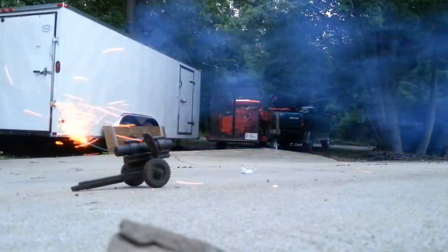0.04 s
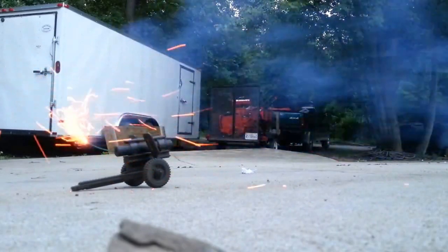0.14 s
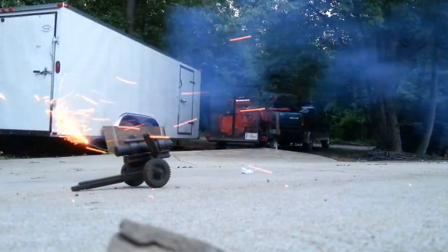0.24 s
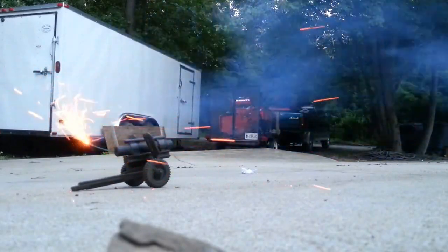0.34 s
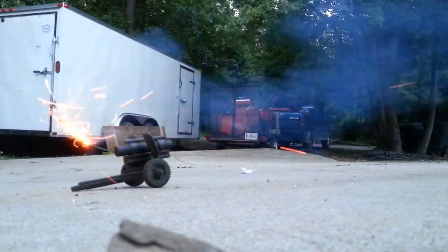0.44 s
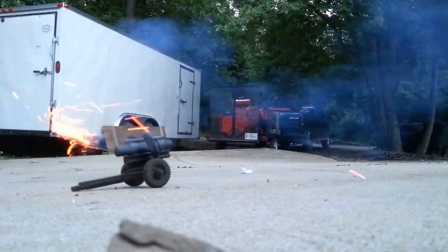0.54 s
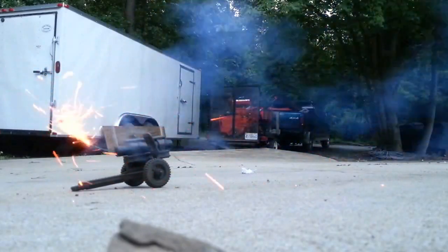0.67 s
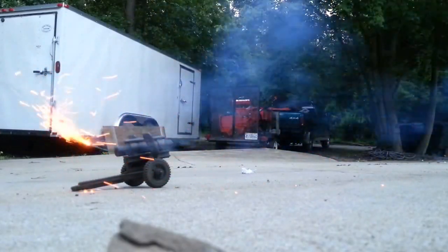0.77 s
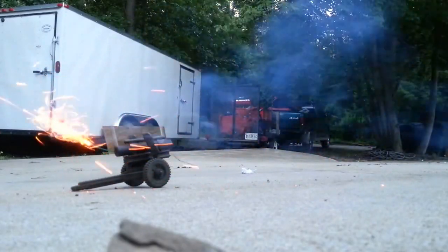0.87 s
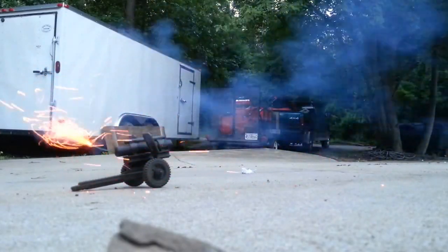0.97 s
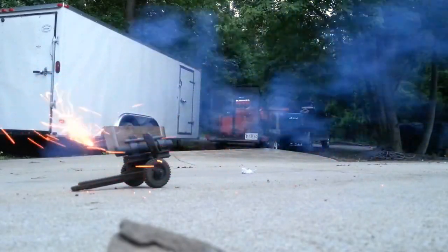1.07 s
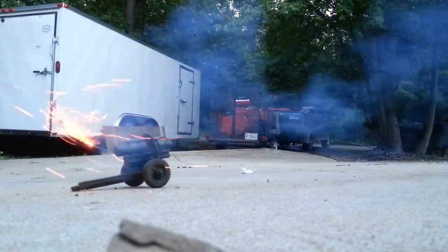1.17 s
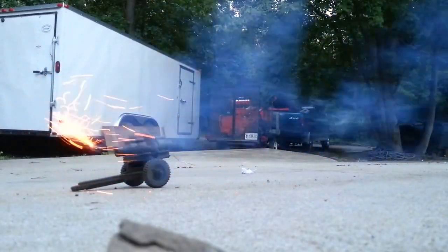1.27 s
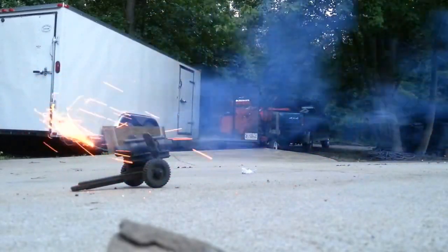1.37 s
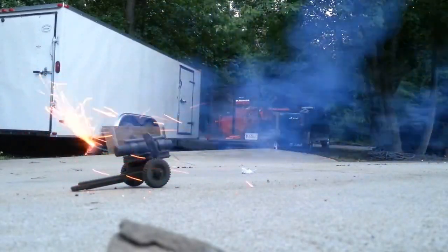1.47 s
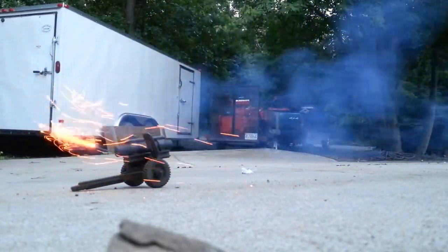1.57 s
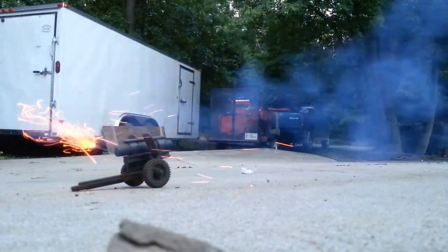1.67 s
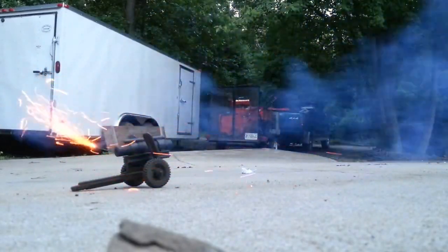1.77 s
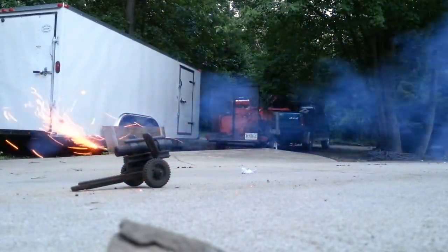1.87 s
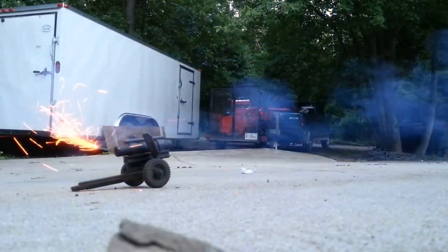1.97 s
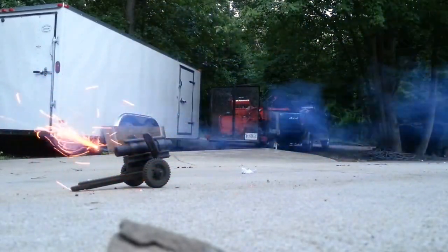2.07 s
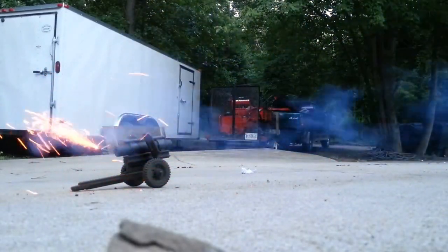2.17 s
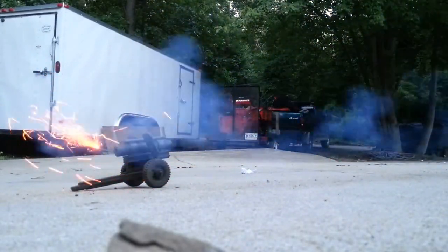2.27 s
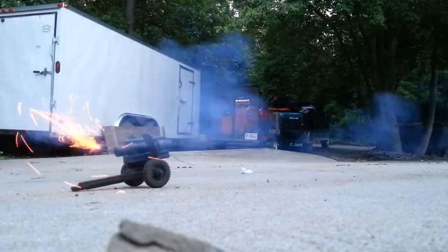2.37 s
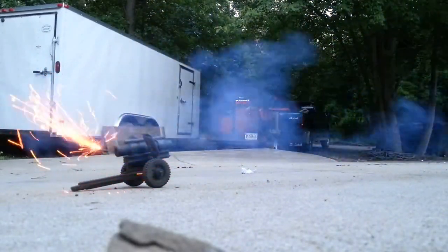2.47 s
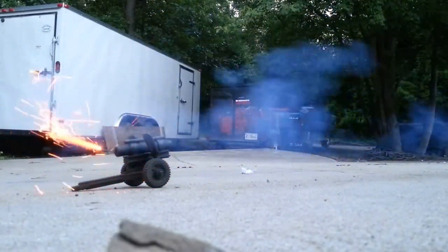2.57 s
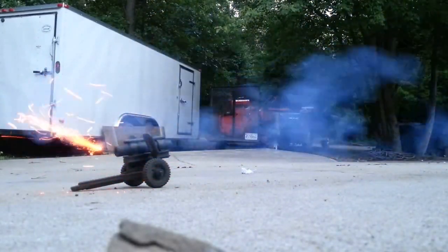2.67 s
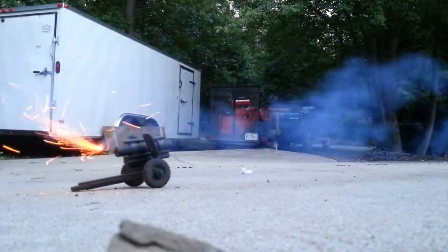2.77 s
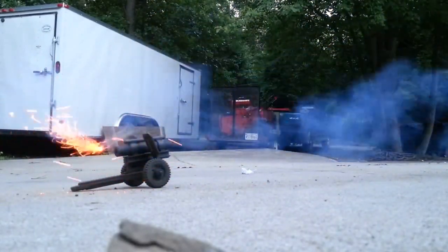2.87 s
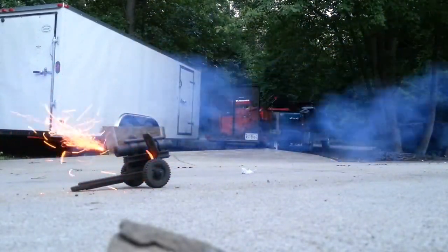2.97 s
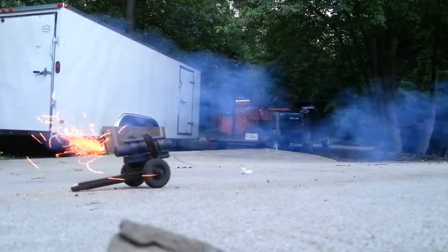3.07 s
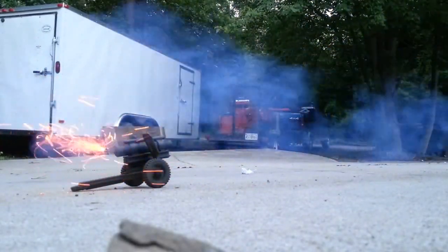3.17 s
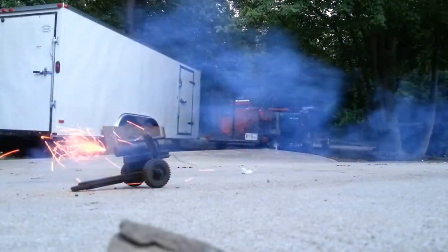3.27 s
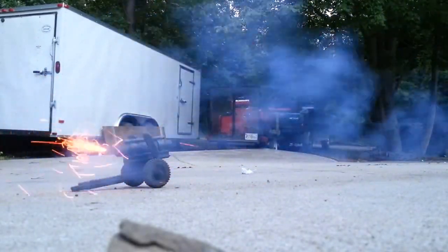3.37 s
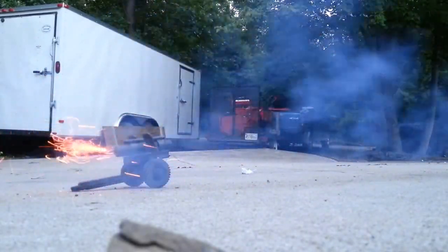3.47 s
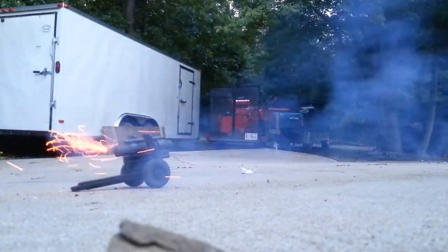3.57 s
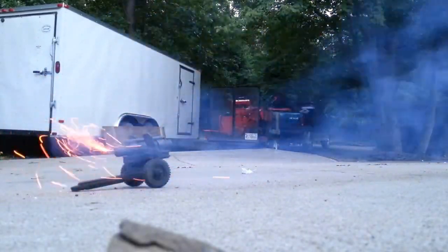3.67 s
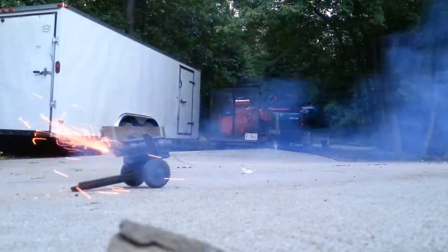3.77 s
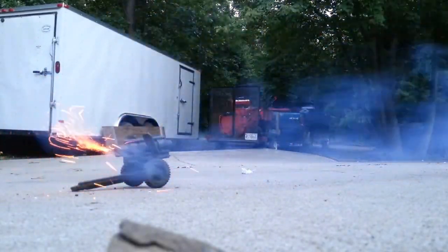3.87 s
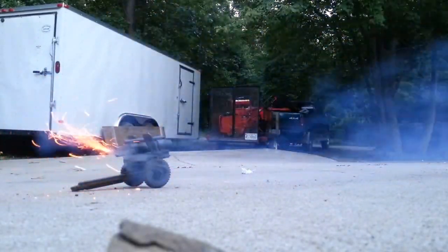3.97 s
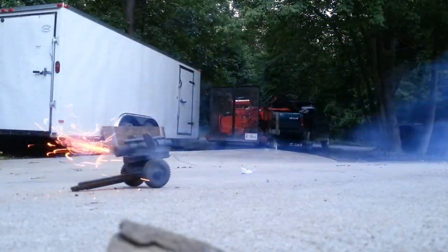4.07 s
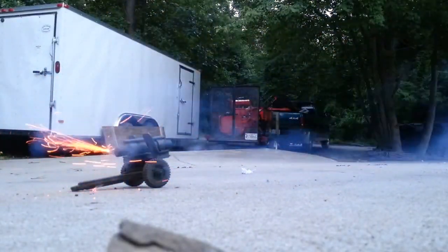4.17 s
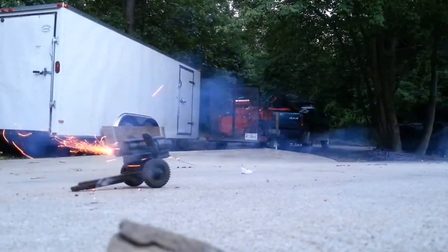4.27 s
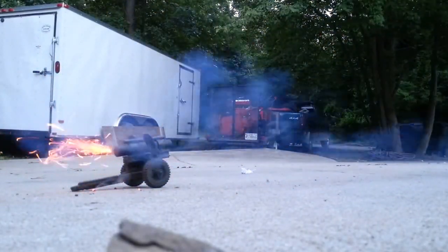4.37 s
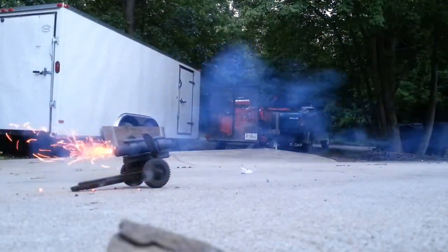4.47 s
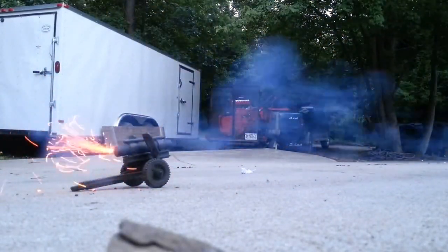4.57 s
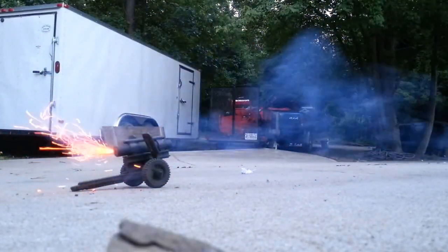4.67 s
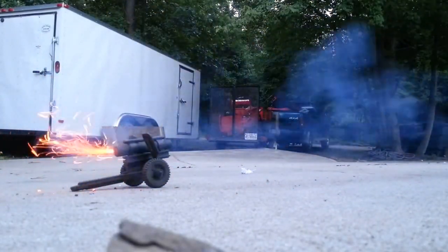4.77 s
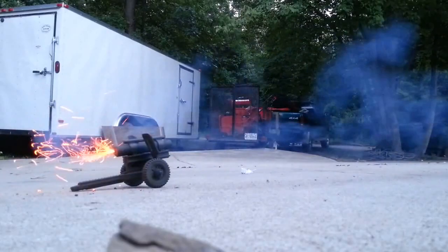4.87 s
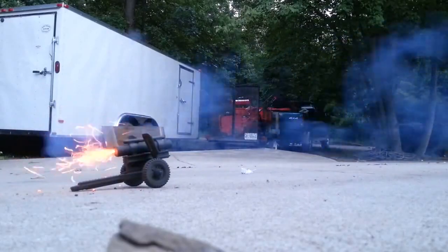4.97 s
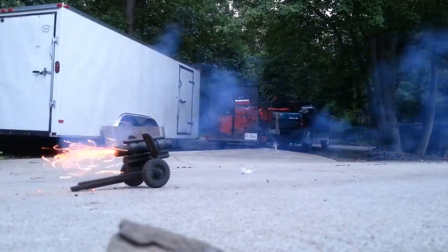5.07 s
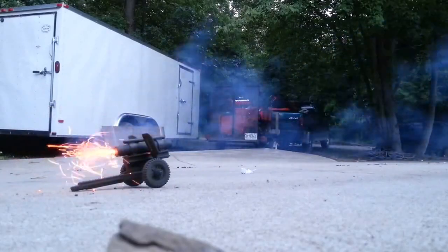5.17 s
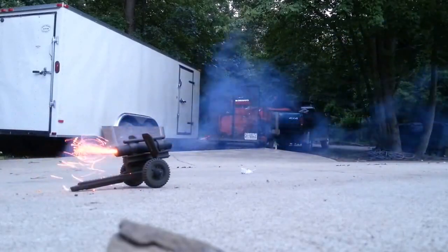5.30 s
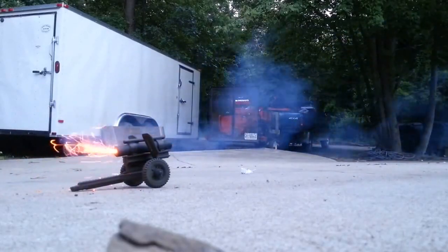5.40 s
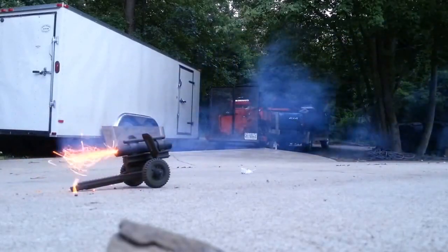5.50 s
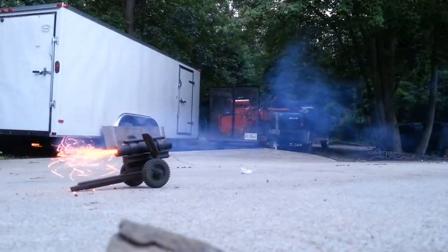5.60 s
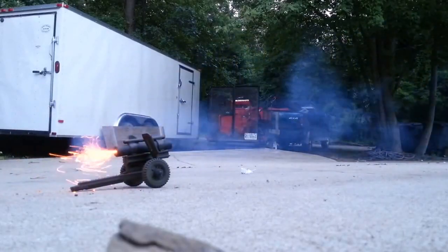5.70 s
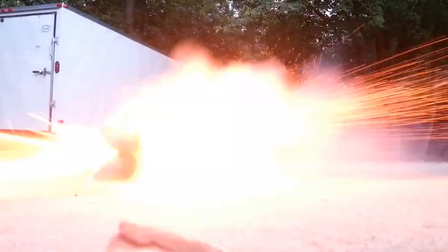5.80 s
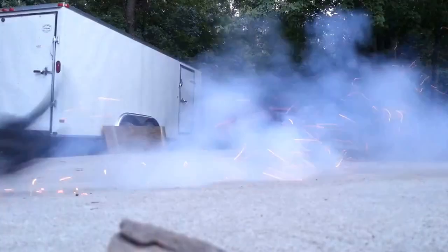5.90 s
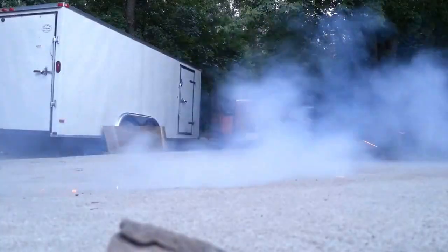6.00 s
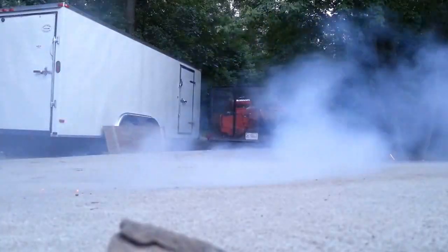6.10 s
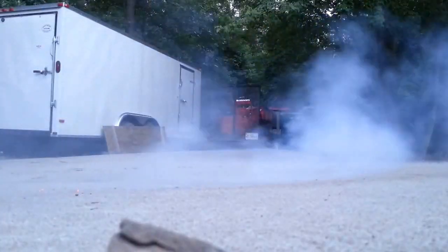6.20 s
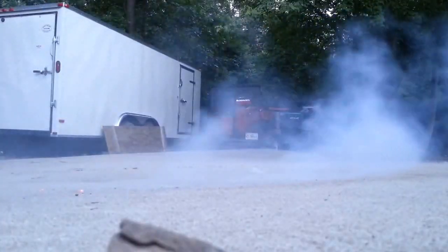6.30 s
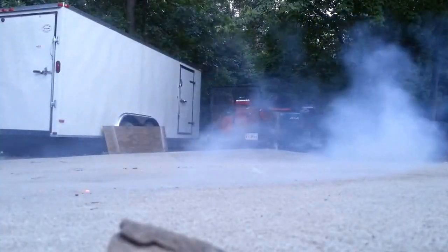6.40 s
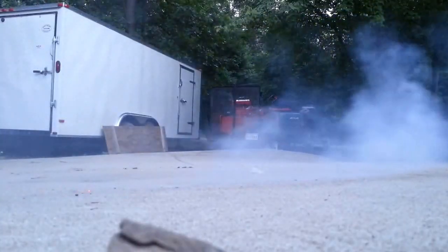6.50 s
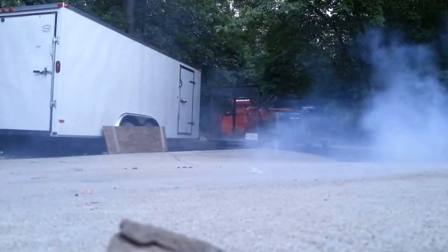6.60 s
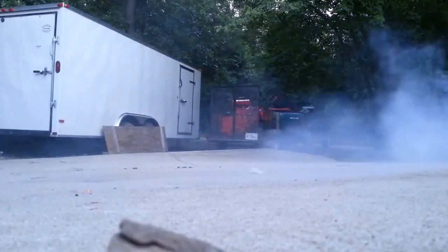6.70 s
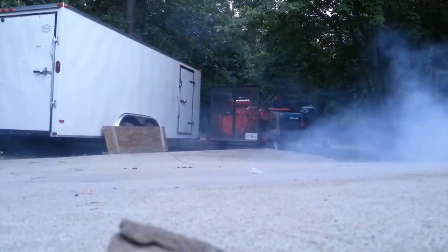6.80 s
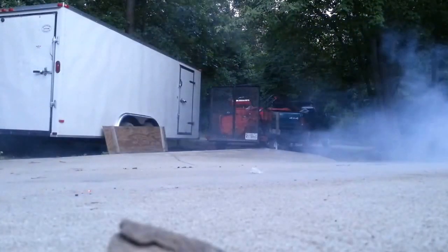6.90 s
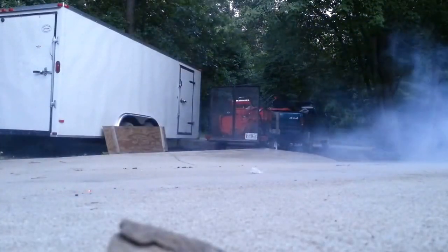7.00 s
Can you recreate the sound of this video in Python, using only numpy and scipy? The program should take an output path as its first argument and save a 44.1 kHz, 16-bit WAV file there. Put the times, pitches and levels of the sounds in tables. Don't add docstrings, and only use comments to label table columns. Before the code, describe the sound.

Outdoors, a fuse hisses and spits steadily for nearly six seconds, then a small cannon fires one deafening, distorted bang with rolling echoes and skittering grit.

```python
import sys
import numpy as np
from scipy import signal
from scipy.fft import rfft, irfft, next_fast_len
from scipy.io import wavfile
from scipy.ndimage import uniform_filter1d, map_coordinates

SR = 44100
rng = np.random.default_rng(int(sys.argv[2]) if len(sys.argv) > 2 else 0)


def put_to_file(sound):
    columns = np.atleast_2d(sound).T
    safe = np.clip(columns, -1, 1)
    whole_steps = np.round(safe * 32767)
    wavfile.write(sys.argv[1], SR, whole_steps.astype(np.int16))


def boost(x):
    u = np.asarray(x, float) / 20
    return 10 ** u


N = 310905
TIME = np.arange(N) / SR


def unit_rms(x):
    return x / np.sqrt(np.mean(x ** 2) + 1e-20)


def in_time(rows):
    s, *columns = np.transpose(rows)
    return [np.interp(TIME, s, column) for column in columns]


def at_hz(points, hz):
    point_hz, values = np.transpose(points)
    return np.interp(np.log(hz + 1), np.log(point_hz), values)


def colour(x, points, share=None):
    size = next_fast_len(N)
    hz = np.arange(size // 2 + 1) * SR / size
    gain = boost(at_hz(points, hz))
    if share is not None:
        gain = gain * np.sign(share(hz)) * np.sqrt(abs(share(hz)))
    return irfft(rfft(x, size) * gain, size)[..., :N]


def drift(rate_hz):
    r = np.exp(-80 * np.pi * rate_hz / SR)
    white = rng.standard_normal(N // 40 + 2002)
    slow = signal.lfilter([1], [1, -2 * r, r * r], white)[2000:]
    return np.interp(np.arange(N) / 40, np.arange(len(slow)), unit_rms(slow))


def delayed(x, lag_s):
    return map_coordinates(x, [np.arange(N) - lag_s * SR], order=3)


def swells(rows):
    return sum(rise_db * np.exp(-((TIME - s) / width_s) ** 2) for s, rise_db, width_s in rows)


# f/Hz, density/dB per Hz
YARD_COLOUR = [(300, 4.5), (1500, 12.5), (3000, 0), (5000, -8), (9000, -9), (11000, -5), (14500, -4),
               (14800, -40)]
YARD_DB = -46
DUCK_DB, RECOVER_S = -20, 0.75


def yard_hiss():
    since = TIME - BLAST[0][0]
    duck_db = DUCK_DB * (since > 0) * np.exp(-(since / RECOVER_S) ** 4)
    hiss = unit_rms(colour(rng.standard_normal((2, N)), YARD_COLOUR))
    return boost(YARD_DB + 1.5 + duck_db) * hiss


# f/Hz, density/dB per Hz
WIND_COLOUR = [(20, -37), (50, 2), (110, 2), (210, -3.5), (350, -20), (600, -53)]
# t/s, rise over breeze/dB, half width/s
GUSTS = [(.65, 5, .2), (1.05, 7, .08), (2.1, 3, .15), (3.3, 2, .2), (4.3, 5.5, .1), (4.97, 6, 0.086),
         (5.27, 10.5, 0.23), (5.85, 8.5, 0.13), (6.08, 10, .07), (6.25, 8, .1), (6.56, 9, .07),
         (6.85, 7, .2)]
BREEZE_DB, BREEZE_RISE_DB_PER_S = -54.5, 1.28


def wind():
    wind_db = BREEZE_DB + BREEZE_RISE_DB_PER_S * TIME + swells(GUSTS)
    own, shared = rng.standard_normal((2, N)), rng.standard_normal(N)
    rumble = unit_rms(colour(0.58 * own + 0.83 * shared, WIND_COLOUR))
    return rumble * boost(wind_db + 6.5 + 2.6 * drift(23))


# start t/s, length/s, start f/Hz, end f/Hz, level/dB
MOTOR = [
    (3.2, 1.3, 146.5, 119.5, -47.5),
    (2.6, .18, 185, 180, -43.5),
    (3.95, .45, 207.5, 199, -49),
]
MOTOR_FADE_S = 0.094


def motor():
    drone = 0
    for s, length_s, start_hz, end_hz, level_db in MOTOR:
        hz = np.interp(TIME, [s, s + length_s], [start_hz, end_hz])
        fade = np.clip(np.minimum(TIME - s, s + length_s - TIME) / MOTOR_FADE_S, 0, 1)
        level = fade * boost(level_db + 4.5 + 1.5 * drift(4.6))
        drone = drone + level * np.sin(2 * np.pi * np.cumsum(hz) / SR)
    return drone


# t/s, level/dB, f/Hz
KNOCKS = [
    (5.117, -16, 210),
    (6.6695, -15, 420),
    (6.914, -20.5, 197),
]


def knocks():
    thuds = 0
    for s, level_db, hz in KNOCKS:
        cycles = np.maximum(TIME - s, 0) * hz
        thuds = thuds + boost(level_db) * np.sin(2 * np.pi * cycles) * np.exp(-cycles ** 2 * 1.6)
    return thuds


# t/s, peak level/dB, left-right/dB, ring/s
GRIT = [(5.9514, -14, 3, 0.0072), (6.3018, -14, 9, 0.015), (6.3667, -23, 14, .04), (6.527, -26, 1, 0.0067),
        (6.7192, -13, 12, .012), (6.722, -20, 9, .008), (6.7244, -19, 7, 0.013), (6.7356, -18, 8, .006),
        (6.7372, -12.5, 21, 0.007), (6.742, -21, 10, .005), (6.7442, -12.5, 14.5, 0.0038),
        (6.7483, -20, 7, .005), (6.7526, -18, 7, 0.0044), (6.765, -40, 5, .02), (6.786, -41, 2, .005)]
# f/Hz, width/Hz, level/dB
GRIT_PEAKS = [(2900, 740, 4), (3940, 1400, -3.5), (6000, 1760, -5), (7500, 1300, -12.5), (10700, 1400, -22),
              (13500, 2000, -19)]


def grit():
    burst, noise = np.full((2, N), 1e-18), rng.standard_normal(N)
    for s, level_db, pan_db, ring_s in GRIT:
        age = TIME - s
        shape = (age > 0) * np.exp(-np.log(1000) * np.maximum(age, 0) / ring_s)
        burst += boost(level_db + 5 + pan_db * np.array([[.5], [-.5]])) * shape * noise
    out = 0
    for k, (hz, width_hz, level_db) in enumerate(GRIT_PEAKS):
        r = np.exp(-np.pi * width_hz / SR)
        b = (1 - r * r) / 2 * np.array([1, 0, -1])
        a = [1, -2 * r * np.cos(2 * np.pi * hz / SR), r * r]
        out = out + (-1) ** k * boost(level_db) * signal.lfilter(b, a, burst)
    return out


# f/Hz, density/dB per Hz
ROLL_COLOUR = [(29, -62), (50, -32.5), (279, -5), (449, -0.5), (494, -2), (1250, -11), (2020, -13),
               (6820, -24.5), (12400, -38), (14000, -44.5), (15000, -57)]
# f/Hz, correlation/-1..1
ROLL_LIKENESS = [(60, 0.56), (240, 1), (950, -0.031), (3760, 0.014), (14900, -0.17)]
# f/Hz, share/1
AIR_LOSS = [(100, 0.25), (400, 0), (1000, 0.13), (2000, 0.36), (5000, 1.21), (8000, 1.5), (10500, 2.8),
            (13000, 3.5)]
# t/s, rise over roll/dB, half width/s
RETURNS = [(5.82, 4.5, 0.016), (5.87, 6.5, 0.021), (6.105, 3, 0.029), (6.21, 3.5, 0.034), (6.29, 2.5, .05),
           (6.55, 1, .06), (6.69, 3.5, .04), (6.82, 4.5, 0.1)]
RETURN_DULLING = 1.08
ROLL_START_S, ROLL_DB, ROLL_HOLD_S, ROLL_FALL_DB_PER_S = 5.81, -16, .29, 33
TREBLE_DB, TREBLE_RISE_S, TREBLE_HOLD_S = -2.5, 0.01, 0.083
TREBLE_FALL_DB_PER_S, TREBLE_FLOOR_DB = 29.5, -30
NEAR_BRIGHT_DB, NEAR_BRIGHT_S = 2.5, 0.08
OVERLOAD_DB, OVERLOAD_S = 9.5, 0.081


def roll():
    age, swell_db = TIME - ROLL_START_S, swells(RETURNS)
    level_db = ROLL_DB - ROLL_FALL_DB_PER_S * np.maximum(age - ROLL_HOLD_S, 0) + swell_db
    level_db = level_db + OVERLOAD_DB * np.exp(-(age / OVERLOAD_S) ** 2)
    treble_db = TREBLE_DB - TREBLE_FALL_DB_PER_S * np.maximum(age - TREBLE_HOLD_S, 0)
    treble_db = np.maximum(treble_db, TREBLE_FLOOR_DB)
    treble_db = treble_db - RETURN_DULLING * swell_db - 6 * np.exp(-(age / TREBLE_RISE_S) ** 2)
    treble_db = treble_db + NEAR_BRIGHT_DB * np.exp(-(age / NEAR_BRIGHT_S) ** 2)
    start = int(ROLL_START_S * SR) - 4000
    edges_hz = 45 * 2 ** np.arange(0, 8.6, .5)
    out, together = np.zeros((2, N)), drift(25)
    white = rng.standard_normal((2, 2, N - start))
    for k, (low, high) in enumerate(zip(edges_hz, edges_hz[1:])):
        band = signal.butter(2, [low, high], "band", fs=SR, output="sos")
        mid, side = signal.sosfilt(band, white[k % 2])
        hz = np.sqrt(low * high)
        alike = np.clip(at_hz(ROLL_LIKENESS, hz), -1, 1)
        gain_db = at_hz(ROLL_COLOUR, hz) + at_hz(AIR_LOSS, hz) * (treble_db + 10)
        gain_db = gain_db + 0.74 * together + 0.58 * drift(24)
        pair = np.sqrt(1 + alike) * mid + np.sqrt(1 - alike) * side * [[1], [-1]]
        out[:, start:] += boost(gain_db + level_db + 19)[start:] * pair
    return out * (age > 0) * boost(np.array([[.8], [-.8]]))


# t/s, level/dB, length/s, right ear late/s
BLAST = [
    (5.798, 29, .0102, -.0012),
    (5.8185, 10, .0035, .0006),
    (5.8255, 9, .004, -.0003),
]


def blast():
    out = np.zeros((2, N))
    for s, level_db, length_s, late_s in BLAST:
        phase = (TIME - s - np.array([[0], [late_s]])) / length_s
        recovery = np.clip((1.2 - phase) / 0.15, 0, 1)
        out += boost(level_db) * (1 - 1.93 * phase) * (phase > 0) * recovery
    return out


# f/Hz, level/dB
SHADOW = [(60, 1.5), (1300, -1.5), (2700, -1), (3500, -4), (4400, -5.5), (6000, -8), (7000, -14.5),
          (8300, -11.5), (9800, -4.5), (14000, -2.5)]
# f/Hz, share/-1..1
DIRECT = [(100, 1), (1200, .33), (2300, .7), (3300, .9), (4300, .56), (6000, .45), (7000, 0), (9400, 0),
          (10800, -.25)]
# f/Hz, share/0..1
AROUND = [(5800, 0), (7000, .4), (8400, .42), (9400, .2), (10300, 0)]
# t/s, lag/us
EAR_LAG = [(0, 165), (2, 160), (3.5, 150.5), (5, 150), (5.4, 145), (5.76, 153)]
CLEARING_S, CLEARING_DB = 4.9, 1.4
SMOKE_DB = .6


def from_left(x, scattered):
    def direct(hz):
        return np.clip(at_hz(DIRECT, hz), -1, 1)

    def around(hz):
        return np.clip(at_hz(AROUND, hz), 0, 1)

    def rest(hz):
        return np.maximum(1 - abs(direct(hz)) - around(hz), 0)

    lag_s = 1e-6 * (in_time(EAR_LAG)[0] + 3.6 * drift(5.1))
    path_db = CLEARING_DB * np.clip(TIME - CLEARING_S, 0, .3) / .3 + SMOKE_DB * drift(14)
    right = boost(path_db) * delayed(colour(x, SHADOW, direct), lag_s)
    right = right + colour(x, SHADOW, around) + colour(scattered, SHADOW, rest)
    return np.array([x, right])


def sizzle(per_s, spread_db, spit_db):
    grains = boost(spread_db * np.minimum(rng.exponential(1, N), 4))
    spits = (rng.random(N) < per_s / SR) * grains
    spits = signal.lfilter([1], [1, -.93], spits)
    return unit_rms(rng.standard_normal((2, N)) * (1 + boost(spit_db) * unit_rms(spits)))


# t/s, dip f/Hz, depth/0..1
DIP = [(0, 10000, .97), (.4, 10400, .97), (.65, 10200, .97), (1.35, 10700, .97), (1.55, 11600, 0.3),
       (1.8, 12200, .7), (2.3, 12700, .8), (2.65, 13500, .6), (3.0, 13900, .2)]
# f/Hz, density/dB per Hz
JET_COLOUR = [(8600, -30), (9300, -5), (10300, -9), (11500, -4), (12500, -4), (13500, -3), (14500, 7),
              (14800, -40)]
BOUNCE_PERIODS, BOUNCE_WANDER = 4, .012


def spark_jet():
    top = unit_rms(colour(sizzle(600, 4.0, -20.5), JET_COLOUR))
    dip_hz, depth = in_time(DIP)
    lag_s = BOUNCE_PERIODS / dip_hz * (1 + BOUNCE_WANDER * drift(7))
    top = top - np.clip(depth, 0, 1) * np.array([delayed(side, lag_s) for side in top])
    return top / uniform_filter1d(top ** 2, size=20000) ** .5


VENT_LIGHTS_S, VENT_PEAK_S, VENT_DB = 5.768, 5.799, 19
VENT_RISE_DB_PER_S, VENT_FALL_DB_PER_S = 1500, 2300


def vent_surge(body, top):
    past = TIME - VENT_PEAK_S
    vent_db = VENT_DB + np.minimum(VENT_RISE_DB_PER_S * past, -VENT_FALL_DB_PER_S * past)
    return (TIME > VENT_LIGHTS_S) * boost(np.maximum(vent_db, -200)) * (body + boost(-6) * top)


# f/Hz, density/dB per Hz
FUSE_COLOUR = [(60, -22.5), (200, -7.5), (900, -5.5), (1700, -8), (2600, -1), (3300, -1), (4200, -2),
               (5500, -4.5), (7300, 0), (8500, -2), (9200, -10.5), (9700, -49)]
# t/s, rise over steady burn/dB, half width/s
FLARES = [(.04, 1.5, 0.065), (.2, 2.5, 0.077), (.35, 3.5, .025), (.5, 1, .06), (.68, 2, 0.065),
          (.86, 3.8, 0.096), (1.15, 1.5, .1), (1.32, 2.5, 0.066), (1.44, 4, 0.031), (1.59, 5, 0.038),
          (1.76, 3, .05), (1.9, 2, 0.082), (2.15, 1.5, .04), (2.48, 2, 0.21), (2.74, 3.5, .035),
          (2.85, 2.5, 0.027), (2.93, 2.8, .04), (3.1, 2.8, 0.083), (3.48, 1, .07), (3.72, 2, 0.037),
          (3.93, 3, 0.053), (4.07, 2.5, 0.053), (4.19, 2, .035), (4.27, -4, 0.027), (4.35, 3.3, .055),
          (4.56, 2, 0.088), (4.8, 2.5, .025), (5.1, 2, 0.16), (5.5, 1.9, 0.073)]
# t/s, level/dB
JET_SWING = [(0, -12.5), (1.4, -11.5), (2.2, -10.5), (2.9, -7), (3.5, -8.5), (3.9, -9.5), (4.5, -6.5),
             (5.2, -2), (5.76, -1.5)]
JET_STEADINESS = 0.67
HISS_DB, FUSE_OUT_S = -35, 5.77


def fuse():
    flare_db = swells(FLARES)
    jet_db = in_time(JET_SWING)[0] - JET_STEADINESS * flare_db
    burn_db = HISS_DB + flare_db + 6.5 + .5 * drift(14.0) + 0.75 * drift(54)
    flutter = boost(burn_db) * (TIME < FUSE_OUT_S)
    body = unit_rms(colour(sizzle(500, 1.7, -18.5), FUSE_COLOUR))
    top = spark_jet()
    burning = flutter * (body + boost(jet_db + 1) * top)
    near, scattered = burning + vent_surge(body, top)
    return from_left(near, scattered)


def scene():
    background = yard_hiss() + wind() + motor() + knocks()
    return background + grit() + roll() + blast() + fuse()


def low_pass(x):
    return signal.sosfilt(signal.butter(12, 15510, fs=SR, output="sos"), x)


CAPSULE_TOP, CLIP_TOP = 2.1, 0.96
LOW_CUT_HZ, RUMBLE_CUT_HZ, CUTOFF_HZ = 120, 56, 14750


def record(dry):
    capsule = CAPSULE_TOP * np.tanh(dry / CAPSULE_TOP)
    cut = signal.sosfilt(signal.butter(2, LOW_CUT_HZ, "high", fs=SR, output="sos"), capsule)
    cut = signal.lfilter(*signal.butter(1, RUMBLE_CUT_HZ, "high", fs=SR), cut)
    cut = signal.sosfilt(signal.cheby2(10, 40, CUTOFF_HZ, fs=SR, output="sos"), cut)
    return low_pass(np.clip(cut, -CLIP_TOP, CLIP_TOP))


dry = scene()
out = record(dry)
put_to_file(out)
```